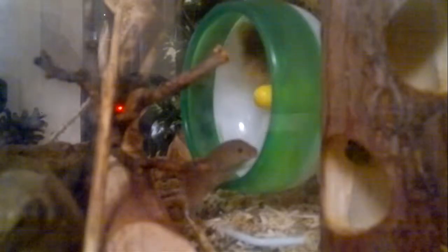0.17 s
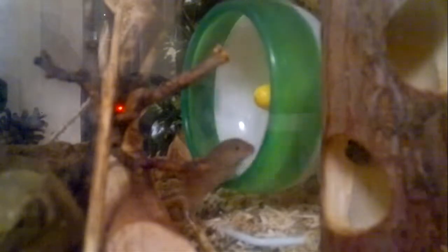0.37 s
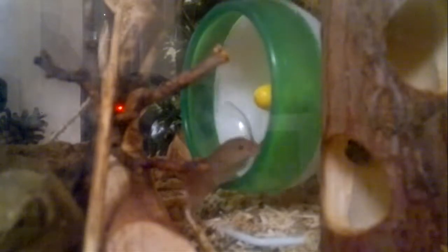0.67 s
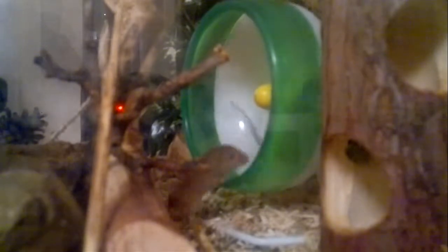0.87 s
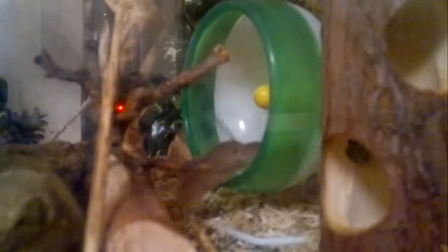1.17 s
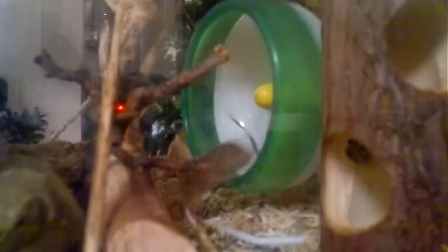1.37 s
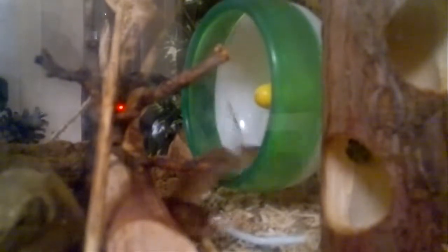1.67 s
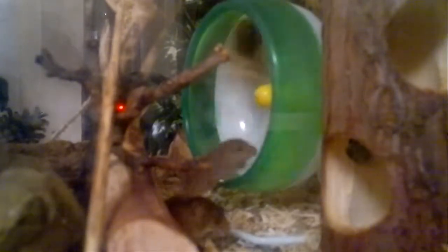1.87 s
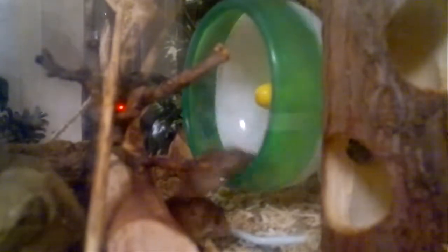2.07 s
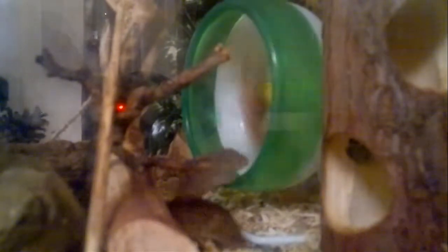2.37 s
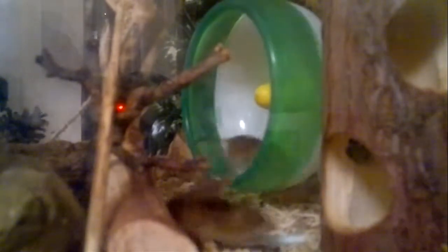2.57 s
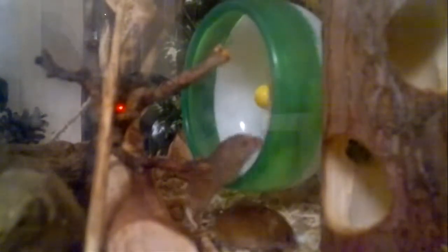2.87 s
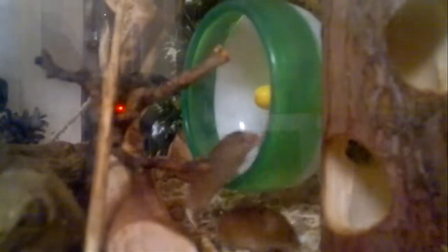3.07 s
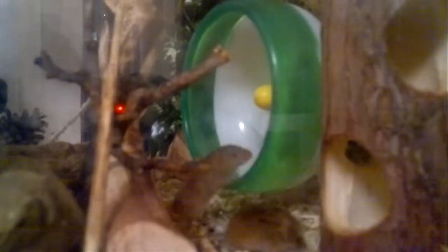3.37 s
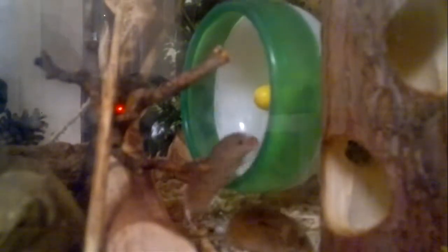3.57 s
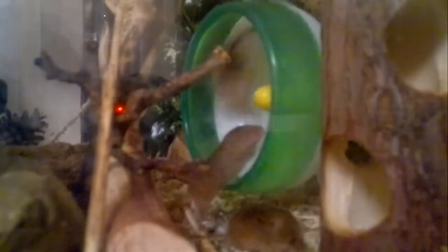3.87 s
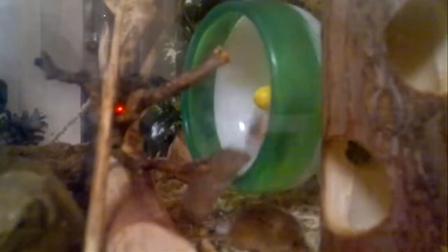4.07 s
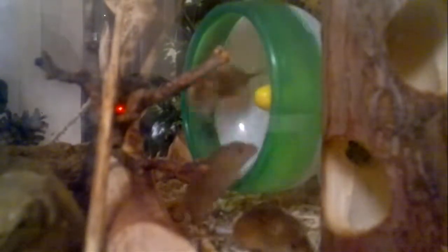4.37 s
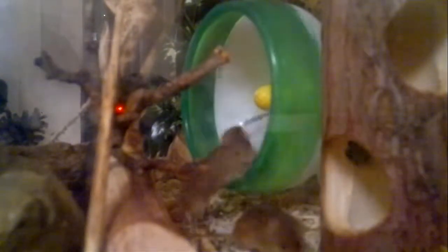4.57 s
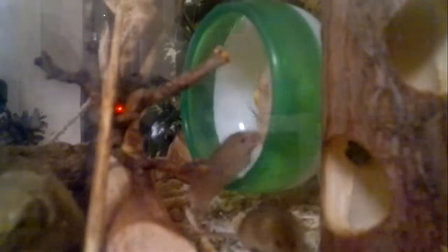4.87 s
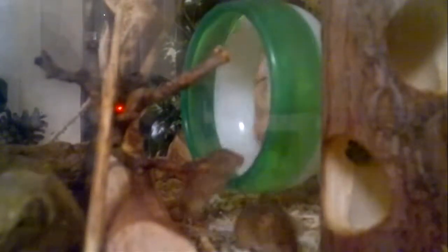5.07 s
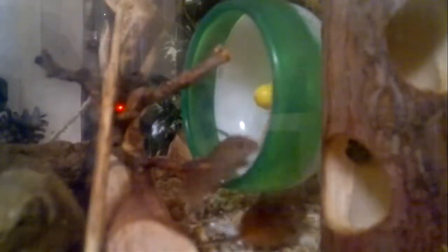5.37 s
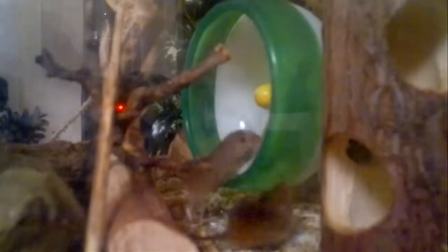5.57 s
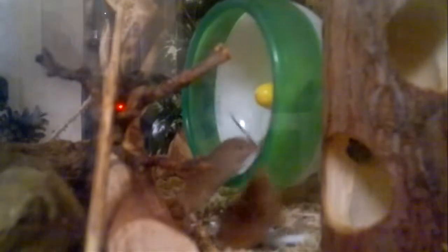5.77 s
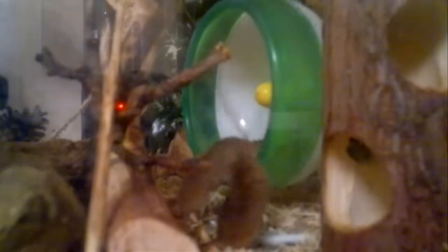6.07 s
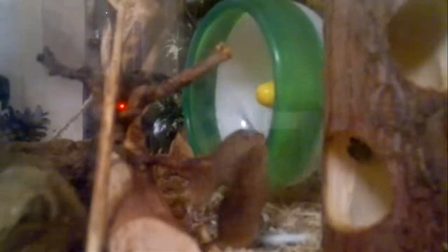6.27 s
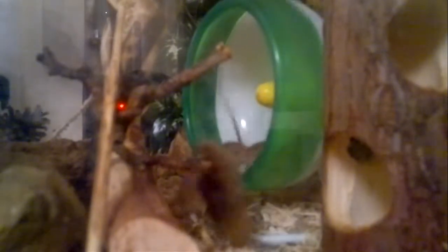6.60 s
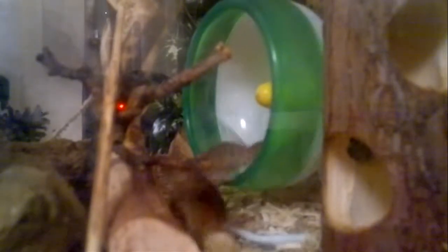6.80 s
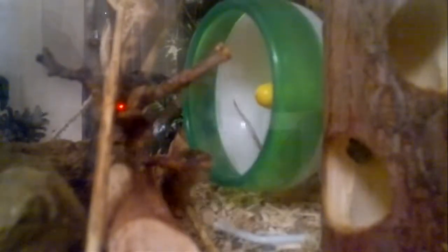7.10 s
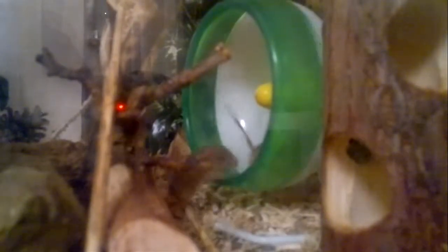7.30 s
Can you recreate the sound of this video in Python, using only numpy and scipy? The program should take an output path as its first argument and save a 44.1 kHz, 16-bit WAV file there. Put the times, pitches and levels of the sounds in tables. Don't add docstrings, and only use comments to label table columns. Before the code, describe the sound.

Small mice scramble in a loose plastic exercise wheel, its stand rumbling and knocking with buzzy rattles over soft hiss, heard very close indoors.

```python
import sys
import numpy as np
from scipy import signal
from scipy.fft import rfft, irfft, next_fast_len
from scipy.io import wavfile
from scipy.ndimage import uniform_filter1d

SR = 44100
rng = np.random.default_rng(int(sys.argv[2]) if len(sys.argv) > 2 else 0)


def attenuation_scalar(level_db):
    decades = np.asarray(level_db, float) / 20
    return 10 ** decades


def generate_wav(signal):
    frames = np.transpose(np.atleast_2d(signal))
    scaled = np.clip(frames, -1, 1) * 32767
    pcm = np.round(scaled).astype(np.int16)
    wavfile.write(sys.argv[1], SR, pcm)


N = 328104
TIME_S = np.arange(N) / SR
PANEL_TOP_HZ = 450

# frequency in Hz, level in dB, left minus right in dB.
MODES = [(141.6, 0.5, 5.5), (190.3, -10.5, -1.5), (211.1, -3, 3.5), (285.9, -1.5, -1.5), (343.9, -8, 1.5),
         (395, -14.5, -8), (450.5, -9, -6.5), (587, -6.5, 3), (731.4, 2, 0.5), (860, 1.5, 10.5),
         (1067, -2.5, 11.5), (1188, 0.5, 0.5), (1310, -28, 2), (1580, -26, -4), (1699, 4, -0.5),
         (2100, -11, 5.5), (2210, -1.5, 21), (2645, -5.5, 11.5), (2700, -17, -10), (3075, -0.5, -12.5),
         (3450, -8.5, -18), (3600, -25.5, -18.5), (3540, -11, 12), (3820, 3, -6), (4320, 3.5, -4.5),
         (4770, 0, 15)]


def rms_one(x):
    return x / np.sqrt(np.mean(x ** 2) + 1e-20)


def band(x, low_hz, high_hz):
    return signal.sosfilt(signal.butter(2, [low_hz, high_hz], "band", fs=SR, output="sos"), x)


def coloured(spectrum, channels):
    hz, db = np.transpose(spectrum)
    bins_hz = np.maximum(np.fft.rfftfreq(N, 1 / SR), 1)
    gain = attenuation_scalar(np.interp(np.log(bins_hz), np.log(hz), db)) * (bins_hz > 15.0)
    return rms_one(irfft(rfft(rng.standard_normal((channels, N))) * gain, N))


def bumps(rows):
    return sum(attenuation_scalar(db) * np.exp(-((TIME_S - s) / half_s) ** 2) for s, db, half_s in rows)


def gain_curve(rows):
    return attenuation_scalar(np.interp(TIME_S, *np.transpose(rows)))


def at_hz(points, hz):
    points_hz, values = np.transpose(points)
    return np.interp(np.log(hz), np.log(points_hz), values)


def effort():
    # time in seconds, level in dB.
    drive = [(0.0, -57.5), (0.7, -62.5), (1.01, -63.5), (1.7, -60.5), (2.46, -62), (2.98, -64),
             (3.73, -59.5), (4.31, -63), (4.66, -64), (5.3, -65), (5.7, -55), (6.2, -63.5), (6.55, -55.5),
             (7.44, -59.5)]
    return gain_curve(drive)


def rumble():
    # time in seconds, level in dB.
    jolts = [(0, -30.5), (0.148, -38), (0.291, -37.5), (1.05, -53), (1.272, -37.5), (1.37, -38),
             (1.758, -35.5), (1.86, -37), (2.09, -38), (2.221, -43), (2.368, -38), (3.049, -34.5),
             (3.361, -39), (4.001, -42), (4.239, -42.5), (4.759, -34.5), (4.852, -30.5), (4.942, -36.5),
             (5.14, -44), (5.312, -35), (5.5, -36.5), (6.102, -40), (6.202, -35), (6.37, -40),
             (6.56, -31.5), (6.66, -40), (6.892, -39.5), (7.11, -39), (7.201, -38), (7.3, -41.5)]
    # time in seconds, level in dB, half length in seconds.
    lurches = [(.47, -33, 0.053), (.76, -40, 0.074), (1.57, -39, 0.062), (1.99, -43, 0.049),
               (2.48, -34.5, 0.051), (2.6, -35.5, 0.029), (2.72, -44, 0.07), (3.49, -38.5, 0.037),
               (3.69, -36, 0.068), (3.9, -30, 0.037), (4.43, -39, 0.076), (5.63, -34, .06),
               (5.86, -41, 0.054), (6.79, -42.5, 0.053), (7.44, -31, 0.062)]
    idle_db, jolt_half_s, right_db = 9, 0.023, -28.5
    centre_hz, width_hz, evenness = 47.2, 26.2, 0.39
    shake = attenuation_scalar(idle_db) * effort() + bumps(lurches)
    shake = shake + bumps([(s, db, jolt_half_s) for s, db in jolts])
    white = rng.standard_normal(N + SR)
    sway = band(white, centre_hz - width_hz / 2, centre_hz + width_hz / 2)[SR:]
    envelope = np.abs(signal.hilbert(rms_one(sway), next_fast_len(N))[:N])
    sway = rms_one(sway / envelope ** evenness)
    sway = rms_one(band(sway, 27.3, 94.7))
    return shake * np.stack([sway, attenuation_scalar(right_db) * np.roll(sway, SR)])


def patches():
    patch_db, patch_s = 3.5, 0.045
    knots = rng.standard_normal(400)
    return attenuation_scalar(patch_db * np.interp(TIME_S / patch_s, np.arange(len(knots)), knots))


def rolling():
    # frequency in Hz, level in dB per Hz.
    spectrum = [(60, -12.5), (95, 8), (150, 1), (218, 5), (285, -1), (385, -2.5), (450, -15), (900, -20),
                (1400, -50)]
    # time in seconds, level in dB, half length in seconds.
    leaps = [(.27, -80, 0.013), (.49, -57, 0.023), (.71, -61, 0.06), (1.26, -59, 0.038), (1.38, -53, .03),
             (1.76, -61, 0.049), (2.035, -45, 0.022), (2.15, -58, 0.035), (3.68, -54.5, 0.044),
             (4.10, -64, 0.019), (4.49, -58, 0.012), (4.76, -61, 0.045), (5.14, -68, 0.011),
             (5.30, -72, 0.045), (5.55, -52, 0.019), (6.18, -58.5, 0.019), (6.36, -58, 0.065),
             (6.64, -50.5, 0.017), (7.025, -47, 0.021), (7.20, -56, 0.01)]
    level_db, own_share = 0.5, 0.39
    both, own = coloured(spectrum, channels=1), coloured(spectrum, channels=2)
    gain = attenuation_scalar(level_db) * effort() * patches() + bumps(leaps)
    return gain * (both + own_share * own) * attenuation_scalar([[1.8], [-2.5]])


def hiss(loud):
    # frequency in Hz, level in dB per Hz.
    spectrum = [(20, -5), (40, 2), (100, -20.5), (300, -16.5), (600, -12.5), (1500, -19.5), (3000, -24.5),
                (6000, -28.5), (11000, -32), (15500, -35)]
    port_db = (-69.5, -71)
    duck_hz, knee_db, hold_s = 8000, -36.0, 0.056
    noise = coloured(spectrum, channels=2) * attenuation_scalar(np.array(port_db))[:, None]
    power = np.mean(loud ** 2, axis=0)
    power = uniform_filter1d(power, round(hold_s * SR), origin=round(hold_s * SR / 4))
    level = np.sqrt(np.abs(power))
    top = signal.sosfilt(signal.butter(2, duck_hz, "high", fs=SR, output="sos"), noise)
    return noise - top * level / (level + attenuation_scalar(knee_db))


def knock_rows():
    # time in seconds, peak in dB, belly and buzz in dB re peak.
    slams = [(0.547, -37.5, -4, -42), (1.314, -32, 2.5, -13.5), (2.057, -32, 5, -16.5),
             (2.425, -37, 4.5, -20.5), (2.465, -28.5, 1, -16), (2.503, -32, -11, -26.5),
             (3.464, -36.5, 0, -32), (3.857, -34.5, -0.5, -17), (4.773, -36.5, 2, -20.5),
             (4.812, -29.5, -8.5, -20.5), (5.671, -32.5, 1, -16.5), (5.774, -39.5, -3, -40),
             (6.521, -28.5, 1.5, -8.5), (6.56, -29.5, -10, -21), (7.05, -35, 2.5, -23.5)]
    # time in seconds, peak in dB, belly in dB re peak.
    taps = [(0.07, -52, -14), (0.244, -60, 9.5), (0.385, -43, -10.5), (0.504, -43, 0), (0.722, -41.5, -0.5),
            (0.864, -44.5, -7), (1.259, -53.5, 3), (1.614, -42.5, 0), (1.831, -42, -0.5),
            (2.223, -45.5, -2.5), (3.003, -50.5, 4), (3.251, -42, -2.5), (3.818, -56.5, 2),
            (4.532, -57, -5), (5.526, -64, 16), (5.631, -44.5, 3.5), (5.945, -48, 0.5), (6.299, -69.5, 14),
            (6.41, -46.5, -4), (6.481, -44, -4.5), (6.884, -44.5, 0.5), (7.185, -58, 3), (7.282, -48, 4)]
    # time in seconds, peak in dB, belly in dB re peak.
    rebounds = [(0.11, -50, -27), (0.763, -37.5, 1.5), (1.654, -37, -4.5), (2.094, -35.5, -14),
                (2.565, -41, -8.5), (3.289, -50.5, -23), (3.502, -33.5, -13.5), (3.542, -41, -11),
                (3.897, -33.5, -8.5), (4.571, -49.5, -3)]
    slam_upper_db, soft_buzz_db, dullest_db = -5.5, -52.5, -47

    def soft(rows, knee_db, upper_db, dulling):
        out = []
        for s, peak_db, belly_db in rows:
            dulled_db = upper_db + dulling * min(peak_db - knee_db, 0)
            out.append((s, peak_db, belly_db, max(dulled_db, dullest_db), soft_buzz_db))
        return out

    hard = [(s, peak_db, belly_db, slam_upper_db, buzz_db) for s, peak_db, belly_db, buzz_db in slams]
    light = soft(taps, knee_db=-42, upper_db=-12, dulling=2.4)
    dull = soft(rebounds, knee_db=-34.5, upper_db=-9.5, dulling=1.4)
    return np.array(hard + light + dull)


def crack(t, rows):
    low_hz, split_hz, high_hz = 2000, 3300, 6500
    level_db, right_db, t60_s = -8.5, -9.5, 0.034
    top_db, buzz_share = -19, 0.38
    *_, upper_db, buzz_db = rows.T
    white = rng.standard_normal((2, len(rows), len(t)))
    decay = attenuation_scalar(-60 * t / t60_s)
    top = attenuation_scalar(top_db + buzz_share * (buzz_db - upper_db))[:, None] * decay
    noise = rms_one(band(white, low_hz, split_hz)) + top * rms_one(band(white, split_hz, high_hz))
    return noise * attenuation_scalar(level_db + upper_db)[:, None] * attenuation_scalar([[[0]], [[right_db]]]) * decay


def chatter(t, rows):
    # delay in seconds, then dB near 800 Hz left, right,
    # dB near 3.5 kHz left, right.
    contacts = [
        (.0008, -5, -8, -8, -17),
        (.0045, -9, -18, -11, -22),
        (.011, -11, -11, -22, -21),
        (.0155, -20, -20, -21, -4),
        (.0175, -12, -11, -22, -8),
        (.0235, -14, -13, -21, -1),
        (.030, -22, -22, -22, -4),
        (.038, -25, -25, -25, -12),
    ]
    # frequency in Hz, t60 in seconds.
    ring_t60 = [(450, 0.084), (1000, 0.032), (2300, 0.033), (3700, 0.022), (6000, 0.02), (11000, .025)]
    # frequency in Hz, level in dB.
    haze = [(450, -25.5), (600, -15), (950, -10.5), (1250, -19.5), (1480, -23), (1900, -11.5), (2700, -20),
            (3600, -1), (4400, -32), (5000, -7), (6500, -11), (8500, -52), (10700, -17.5), (12500, -54)]
    weak_count, level_db, habit_db, fresh = 150, -8.5, 5.5, 0.65
    linger_db, linger_t60_s, linger_edge_hz, linger_high_db = -20, 0.58, 2500, -11.5
    snap_t60_s, soft_s, ports_apart_hz = 0.027, 0.0017, 800
    top_hz, top_late_db, top_right_db = 4350, -9, -21.5

    main_hz, main_db, pan_db = np.transpose([m for m in MODES if m[0] >= PANEL_TOP_HZ])
    weak_hz = np.geomspace(haze[0][0], haze[-1][0], weak_count)
    weak_hz = weak_hz * attenuation_scalar(0.1 * rng.standard_normal(weak_count))
    hz = np.concatenate([main_hz, weak_hz])
    mode_db = np.concatenate([main_db, at_hz(haze, weak_hz)]) + level_db
    pan_db = np.concatenate([pan_db, 0 * weak_hz])
    lag = rng.uniform(-1, 1, len(hz)) * np.clip(hz / ports_apart_hz, 0, np.pi)

    ring = attenuation_scalar(-60 * np.outer(1 / at_hz(ring_t60, hz), t))
    lingers = (hz < 4500) & (np.arange(len(hz)) >= len(main_hz))
    linger_gain = lingers * attenuation_scalar(linger_high_db * (hz > linger_edge_hz))
    linger = attenuation_scalar(linger_db - 60 * t / linger_t60_s) * linger_gain[:, None]
    snap = attenuation_scalar(-60 * t / snap_t60_s)
    onset = np.sin(np.pi / 2 * np.minimum(t / soft_s, 1)) ** 2
    decay = (ring + linger + snap) * onset

    bright_db = np.array([at_hz([(1150, 0.0096), (1450, upper_db), (2700, upper_db), (3400, buzz_db)], hz)
                          for *_, upper_db, buzz_db in rows])
    high = np.clip(np.log2(hz / 1900) / 0.7, 0, 1)
    top = np.clip(4 * np.log2(hz / top_hz) + 0.5, 0, 1)
    out = np.zeros((2, len(rows), len(t)))
    for k, (delay_s, *side_db) in enumerate(contacts):
        habit = attenuation_scalar(habit_db * rng.standard_normal(len(hz))) * rng.choice([-1, 1], len(hz))
        if k == 0:
            habit = np.where(hz < 2700, np.abs(habit), habit)
        strength = attenuation_scalar(mode_db + bright_db) * (habit + fresh * rng.standard_normal(bright_db.shape))
        start = round(delay_s * SR)
        late = delay_s > contacts[1][0]
        for ch, sign in enumerate((1, -1)):
            phase = 2 * np.pi * np.outer(hz, t) + (lag[:, None] if ch else 0)
            rings = decay * np.sin(phase)
            low_db, high_db = side_db[ch], side_db[ch + 2]
            port = attenuation_scalar(low_db + high * (high_db - low_db) + sign * pan_db / 2)
            port = port * attenuation_scalar(top * (top_right_db * ch + top_late_db * late))
            out[ch, :, start:] += (strength * port @ rings)[:, :len(t) - start]
    return out


def swell(t, rise_s, hold_s, t60_s):
    tail_db, tail_t60_s = -19, 0.46
    after = np.maximum(t - rise_s - hold_s, 0)
    fall = attenuation_scalar(-60 * after / t60_s) + attenuation_scalar(tail_db - 60 * after / tail_t60_s)
    return np.sin(np.pi / 2 * np.clip(t / rise_s, 0, 1)) * fall


def panels(t, rows):
    # low edge in Hz, high edge in Hz, swell in seconds, hold in seconds, t60 in seconds.
    thud = (100, 170, .008, .014, .08)
    belly = (170, 250, .033, .005, .04)
    walls = (250, 450, .004, .042, .05)
    group_db = (-8.0, 2.5, -12)
    spread_db, belly_shares = 3.0, (0.5, 1, 0.5)
    hz, mode_db, pan_db = np.transpose([m for m in MODES if m[0] < PANEL_TOP_HZ])
    port = attenuation_scalar(np.outer([1, -1], pan_db / 2))
    sines = port[..., None] * np.sin(2 * np.pi * np.outer(hz, t))
    chance = rng.standard_normal((len(rows), len(hz)))
    out = 0
    for group, db, share in zip((thud, belly, walls), group_db, belly_shares):
        low_hz, high_hz, rise_s, hold_s, t60_s = group
        strength = attenuation_scalar(mode_db + spread_db * chance) * (hz >= low_hz) * (hz < high_hz)
        strength = strength * attenuation_scalar(db + share * rows[:, 2:3])
        out = out + strength @ sines * swell(t, rise_s, hold_s, t60_s)
    return out


def rattle(t, rows):
    low_hz, high_hz, tail_low_hz, tail_high_hz = 3100, 4400, 2000, 3800
    level_db, centre_s, half_s, left_db = -6.5, 0.019, 0.0069, -6
    tail_db, tail_t60_s = -25.5, 0.66
    *_, upper_db, buzz_db = rows.T
    white = rng.standard_normal((2, len(rows), len(t)))
    burst = rms_one(band(band(white, low_hz, high_hz), low_hz, high_hz))
    burst = burst * np.exp(-((t - centre_s) / half_s) ** 2)
    burst = burst * attenuation_scalar(level_db + buzz_db)[:, None] * attenuation_scalar([[[left_db]], [[0]]])
    tail = rms_one(band(white, tail_low_hz, tail_high_hz)) * attenuation_scalar(tail_db - 60 * t / tail_t60_s)
    return burst + tail * attenuation_scalar((upper_db + buzz_db) / 2)[:, None]


def knocks():
    length_s = 0.18
    t = np.arange(round(length_s * SR)) / SR
    rows = knock_rows()
    each = crack(t, rows) + chatter(t, rows) + panels(t, rows) + rattle(t, rows)
    each = each * np.cos(np.pi / 2 * (t / length_s) ** 4)
    out = np.zeros((2, N + len(t)))
    for k, (s, peak_db, *_) in enumerate(rows):
        at = round(s * SR)
        out[:, at:at + len(t)] += attenuation_scalar(peak_db) * each[:, k]
    return out[:, :N]


def brushing():
    # time within the turn in seconds, level in dB.
    spots = [(.077, -80.5), (.243, -81.5), (.385, -80), (.565, -80), (.74, -81), (.93, -81)]
    # time in seconds, level in dB.
    pressing = [(0, 3), (.95, 2), (1.3, -4), (2.5, -5), (3.0, 1.5), (6.4, 1), (6.8, -2), (7.44, -4)]
    turn_s, half_s = 1.0345, 0.019
    white = rng.standard_normal(N)
    brush = rms_one(band(white, 7600, 8600)) + 0.77 * rms_one(band(rng.permutation(white) * 0 + white, 9800, 10900))
    touches = [(s + turn * turn_s, db, half_s) for turn in range(8) for s, db in spots]
    return rms_one(brush) * gain_curve(pressing) * bumps(touches) * attenuation_scalar([[0], [-14.0]])


def rustle():
    # time in seconds, level in dB, half length in seconds.
    puffs = [(1.41, -76, 0.021), (4.03, -76, 0.013), (6.71, -76, .02), (6.965, -73.5, .012),
             (6.995, -74, 0.011), (7.24, -74, 0.011)]
    noise = rms_one(band(rng.standard_normal((2, N)), 3300, 5600))
    return noise * bumps(puffs) * attenuation_scalar([[1.5], [-4.0]])


def pop():
    mode = (430, -17.5, 0.011)
    start_s, rise_s = 6.641, 0.0028
    hz, db, t60_s = mode
    t = np.maximum(TIME_S - start_s, 0)
    return attenuation_scalar(db - 60 * t / t60_s) * np.minimum(t / rise_s, 1) * np.sin(2 * np.pi * hz * t)


def scene():
    blows = knocks() + pop()
    return rumble() + rolling() + hiss(blows) + blows + brushing() + rustle()


def roll_off(x):
    return signal.sosfilt(signal.butter(12, 15630, fs=SR, output="sos"), x)


def record(dry):
    bend, right_late_samples, cutoff_hz = 4.8, 4, 16050
    swing = band(dry, 80, 880)
    bent = dry + bend * band(swing ** 2, 18, 1100) * [[0.4], [1]]
    low_pass = signal.cheby2(12, 40, cutoff_hz, fs=SR, output="sos")
    left, right = signal.sosfiltfilt(low_pass, bent)
    return roll_off(np.stack([left, np.roll(right, right_late_samples)]))


dry = scene()
out = record(dry)
generate_wav(out)
```